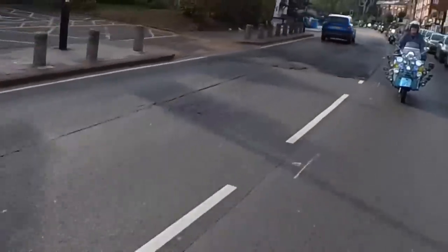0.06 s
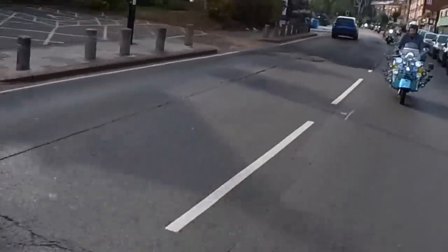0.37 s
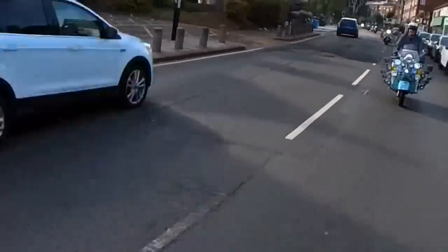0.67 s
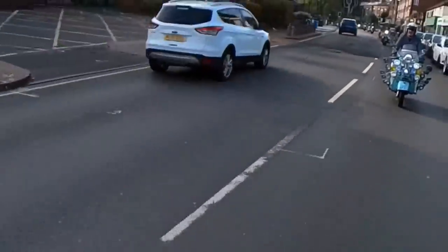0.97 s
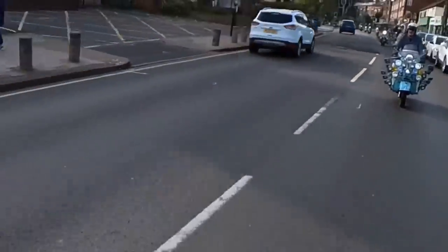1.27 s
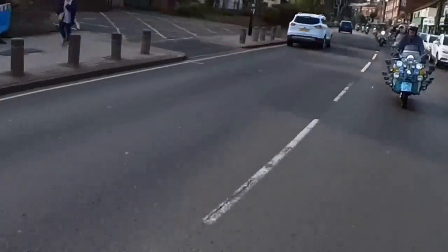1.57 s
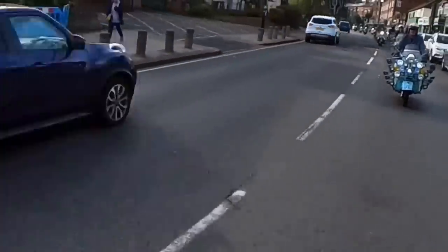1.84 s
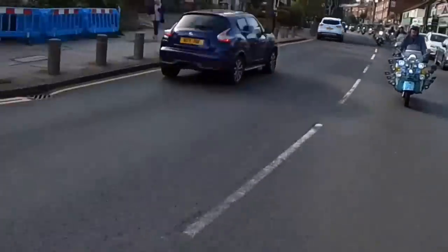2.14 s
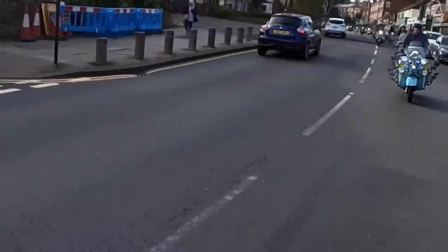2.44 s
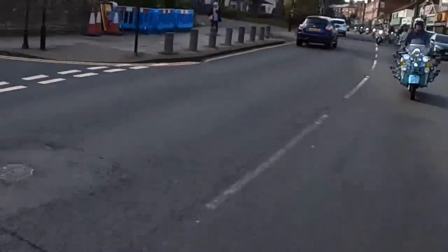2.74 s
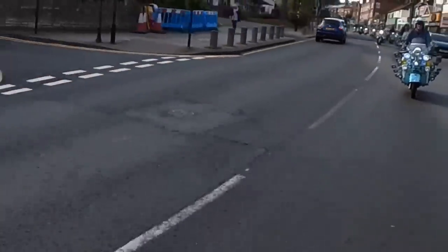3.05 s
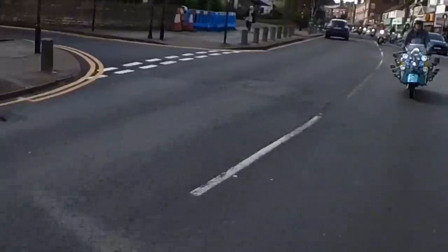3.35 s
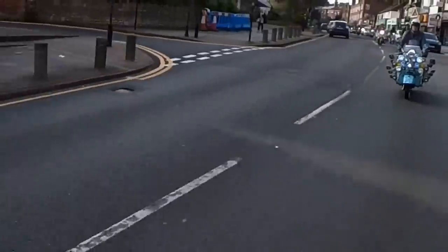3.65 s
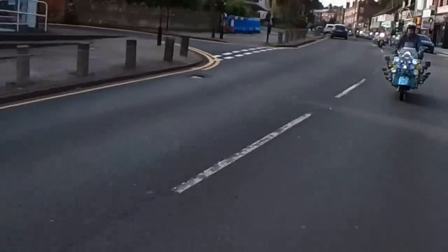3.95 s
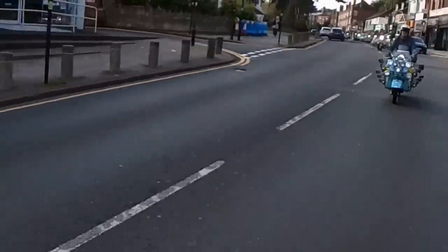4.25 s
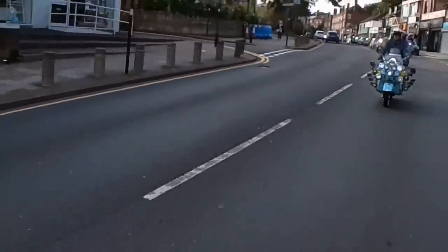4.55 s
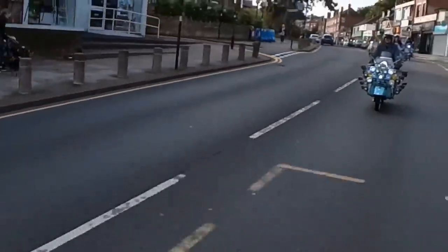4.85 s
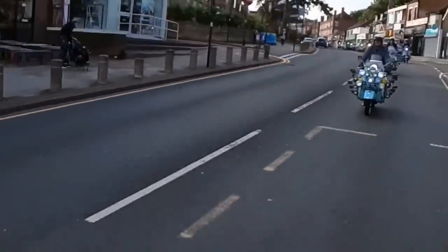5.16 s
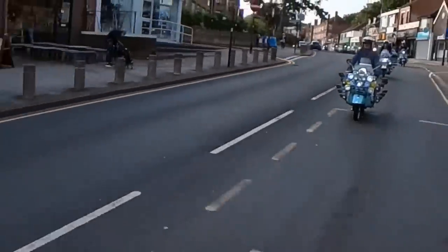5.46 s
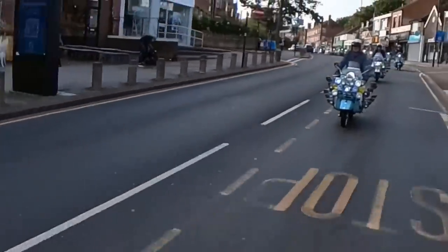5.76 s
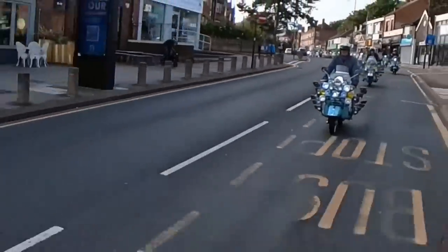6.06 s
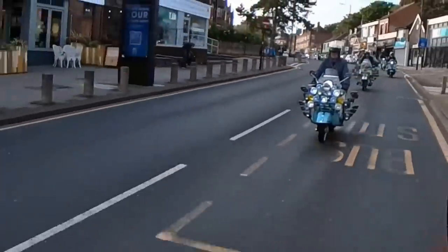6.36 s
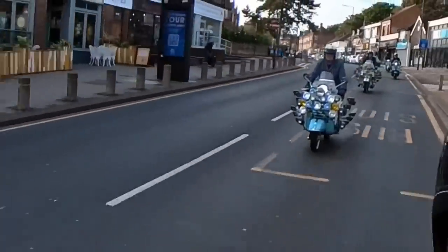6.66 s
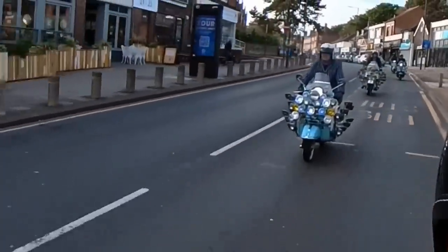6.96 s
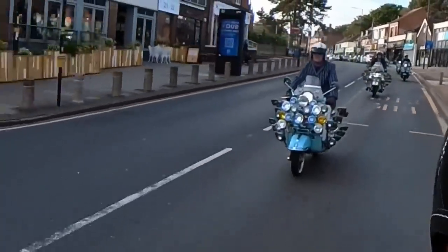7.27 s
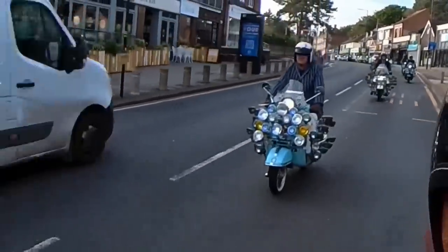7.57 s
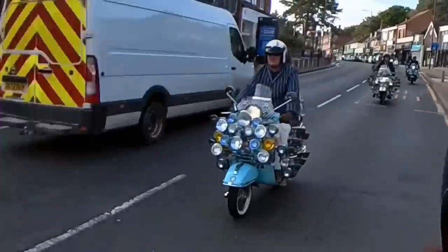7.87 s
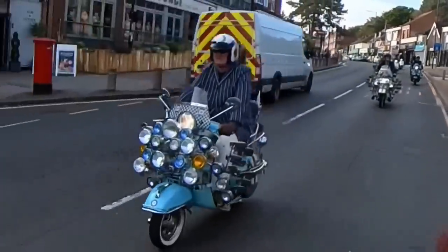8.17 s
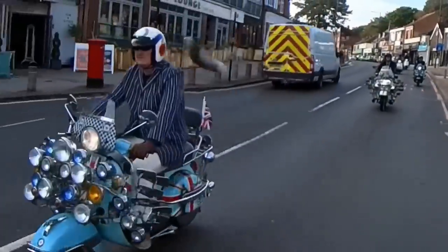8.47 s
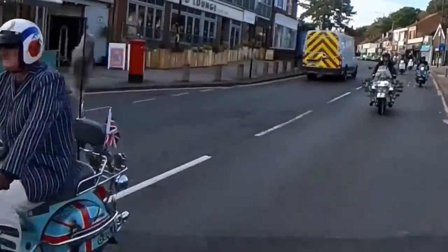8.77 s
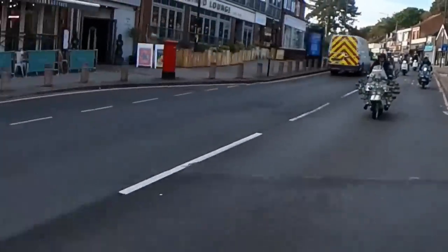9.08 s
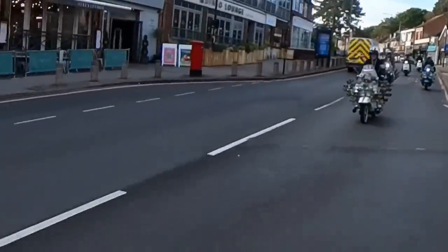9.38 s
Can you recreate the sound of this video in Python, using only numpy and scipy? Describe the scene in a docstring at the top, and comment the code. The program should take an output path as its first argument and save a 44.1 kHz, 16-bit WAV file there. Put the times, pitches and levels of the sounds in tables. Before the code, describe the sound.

A single-cylinder motorbike drones under throttle, heard from the bike itself, with wind rumbling on the microphone and tyres rushing on the road. Several dull bumps and sharp metallic ticks come in the first half second, and a car swishes faintly past at about 1.3 seconds. From 2.5 seconds the throttle closes and the engine falls in pitch. Between 3 and 4.3 seconds a loud squall hits the microphone in short, crackling blasts, briefly pushing the other sounds down. The engine then slows to an even, round thudding, while the slack chain rattles and rings lightly against its guard. Softer gusts keep thumping now and then. A van passes with a mild tyre swell around 7.7 seconds. From about 8.5 seconds a two-stroke scooter grows louder alongside, popping unevenly, with a short metallic clatter just after 9 seconds, the motorbike still thudding.

```python
"""Motorbike leading a scooter convoy

A single-cylinder engine pulls, then the throttle closes and it slows to an even thudding while
the chain rattles. Tyres rush, a car and a van go by, and a popping scooter draws past at the end.
Bumps in the road thump at the start. Wind buffets the microphone of a camera on the bike and
tears at it in a squall. The camera turns everything down whenever the sound gets too loud."""
import sys
import numpy as np
from scipy import signal
from scipy.fft import rfft, irfft, next_fast_len
from scipy.io import wavfile
from scipy.ndimage import uniform_filter1d, minimum_filter1d, map_coordinates

SR = 44100
rng = np.random.default_rng(int(sys.argv[2]) if len(sys.argv) > 2 else 0)


def generate_wav(sig):
    """Save sig (samples, or channels by samples) to the path in sys.argv[1] as 16-bit PCM at SR."""
    pcm = np.round(np.clip(np.atleast_2d(sig).T, -1, 1) * 32767).astype(np.int16)
    wavfile.write(sys.argv[1], SR, pcm)


N = 420273

# how fast the bike's engine fires: time_s, rate_hz
FIRING_RATE = [(0, 34.72), (2.3, 34.89), (2.9, 31.37), (3.75, 28.12), (4.5, 26.43), (6.05, 23.89),
               (6.9, 23.63), (7.55, 25.05), (8, 24.25), (8.95, 23.48), (9.53, 23.27)]
# how far the throttle is open: time_s, opening (0 to 1)
THROTTLE_OPENING = [(0, 0.95), (2.4, 0.95), (3.1, .34), (3.7, 0.03), (9.53, 0.12)]
# exhaust loudness and the bark of its upper harmonics: time_s, level_db, bark (0 to 1)
EXHAUST_LEVEL = [(0, -27, 0), (1.3, -28.5, 0.55), (1.7, -30.5, 0.48), (2.5, -30.5, 0.65), (2.9, -26, 0),
                 (3.4, -19.5, 0.3), (4.6, -23, 0.03), (5.1, -24.5, 0.06), (5.75, -24, 0.18),
                 (6.2, -27.5, 0.54), (7.3, -26.5, 0.11), (8.7, -24.5, 0.01), (9.1, -26, 0.1),
                 (9.53, -26.5, 0.9)]
# exhaust tone with the throttle open: multiple of the firing rate, level_db
PULLING_HARMONICS = [(1, -11), (2, 5), (3, -5), (4, -7.5), (5, -4), (6, -3.5), (7, -11.5), (8, -24),
                     (9, -30.5), (10, -11), (11, -29), (12, -32.5), (13, -21), (14, -18.5), (15, -39.5),
                     (16, -28)]
# exhaust tone with the throttle shut: multiple of the firing rate, level_db
COASTING_HARMONICS = [(1, -22), (2, -9.5), (3, 1.5), (4, 5.5), (5, 2.5), (6, -2.5), (7, -10), (8, -6),
                      (9, -20), (10, -15.5), (11, -35.5), (12, -23.5), (13, -24.5), (14, -31), (15, -26),
                      (16, -42.5), (17, -19), (18, -31.5), (19, -34.5), (20, -39.5)]
# pipe resonances that the harmonics slide through as the bike slows: pitch_hz, gain_db
PIPE_TONE = [(80, 1.5), (96, 2.5), (107, -2), (118, 0.5), (130, 3.5), (145, 0.5), (162, -1), (195, 0),
             (380, -3.5), (430, 9.5), (460, 3.5), (490, 3.5), (560, 6.5)]
# tone of the exhaust's bark: pitch_hz, gain_db
BARK_TONE = [(90, -40), (125, -17), (160, 1), (200, 12), (250, 0.5), (300, 0), (350, 4.5), (430, -11.5),
             (600, -1), (900, -22.5)]
# tone of gas leaving a muffler: pitch_hz, gain_db
MUFFLER_TONE = [(60, -22.5), (130, -4.5), (200, 3), (280, -0.5), (400, -0.5), (600, -20.5), (1200, -31),
                (3000, -40.5), (5000, -73.5)]

# main slaps of the drive chain: time_s, level_db
MAIN_SLAPS = [(0.025, -52.5), (0.1, -49.5), (0.1773, -47), (0.2702, -43), (0.377, -50), (0.559, -51),
              (0.864, -50.5), (1.138, -55), (1.343, -49), (1.394, -50), (1.474, -45.5), (1.6197, -51.5),
              (1.6982, -48.5), (2.0064, -51), (2.084, -56), (2.34, -51.5), (2.436, -47.5), (2.501, -46),
              (2.582, -48), (2.693, -53), (2.7734, -45.5), (2.837, -50), (2.917, -52.5), (4.412, -46.5),
              (4.493, -47), (4.603, -44.5), (4.67, -45), (4.734, -47), (4.849, -50), (4.913, -50),
              (5.01, -45.5), (5.172, -48.5), (5.257, -47.5), (5.33, -47), (5.401, -46.5), (5.499, -45.5),
              (5.561, -48.5), (5.69, -49), (5.772, -48), (5.87, -47), (6.049, -54), (6.13, -48),
              (6.21, -45), (6.275, -48.5), (6.388, -44.5), (6.472, -45), (6.568, -44), (6.652, -50),
              (6.751, -47), (6.829, -49), (6.947, -43.5), (7.028, -45), (7.129, -46.5), (7.21, -50),
              (7.276, -47.5), (7.341, -46.5), (7.54, -49.5), (7.719, -47), (7.866, -47.5), (7.931, -47),
              (8.146, -52), (8.229, -46.5), (8.296, -49.5), (8.3803, -47.5), (8.895, -51), (8.986, -47),
              (9.084, -45), (9.222, -49.5), (9.369, -50.5)]
# tone of the running chain: pitch_hz, gain_db
CHAIN_TONE = [(3000, -33.5), (5200, -18), (5700, -9), (6400, -2.5), (7100, 0.5), (7800, -4), (8500, -13),
              (9100, -30)]
# tone of a slap scraping the chain guard: pitch_hz, gain_db
SLAP_TONE = [(700, -16.5), (1300, 8.5), (1620, 0.5), (1900, 14), (2800, 2.5), (3600, -4.5), (4300, -7.5),
             (4800, -21.5), (5300, -11.5), (5700, -5), (7100, 8), (8300, -6.5), (9100, -12.5)]
# ringing notes of the guard: pitch_hz, level_db, fade_s (time to fall 60 dB)
GUARD_NOTES = [(1875, 3, 0.09), (1815, 1.5, 0.09), (1965, -3, 0.07), (2205, -7, 0.06), (2740, -7, 0.08),
               (2910, -12, 0.06), (3540, -14, 0.08), (3800, -18, 0.08)]
# sharp ticks from the bike's fittings: time_s, level_db
FITTING_TICKS = [(0.1785, -46), (.2698, -37), (.351, -50), (.363, -44), (0.3778, -35), (.433, -50.5),
                 (0.4543, -39.5), (.545, -52), (.562, -40), (0.702, -43), (1.218, -45), (1.2352, -39.5),
                 (1.3143, -45.5), (1.343, -33), (1.618, -46), (1.699, -44), (1.763, -49.5), (2.007, -44.5),
                 (2.1425, -42.5), (2.228, -51), (2.436, -44.5), (2.501, -45.5), (2.693, -53),
                 (2.773, -49.5), (5.015, -41.5), (6.749, -40), (6.831, -43.5), (7.061, -34),
                 (8.6479, -34.5)]
# tone of a tick: pitch_hz, gain_db
TICK_TONE = [(1500, -15.5), (3500, -1.5), (4700, -17), (5700, -1), (7100, 12), (8300, 2), (9100, -14)]

# wind rumble between gusts: time_s, level_db
WIND_LEVEL = [(0, -30.5), (.9, -36), (2.7, -27.5), (4.5, -35.5), (6.9, -39.5), (8.3, -45.5), (8.7, -43),
              (9.53, -43.5)]
# gusts that thump the microphone: time_s, level_db, half_length_s
WIND_GUSTS = [(0, -26, 0.026), (0.33, -25.5, 0.07), (0.57, -26, 0.11), (1.458, -44.5, 0.083),
              (1.71, -26, 0.27), (2.106, -27.5, 0.046), (2.634, -22.5, 0.1), (2.929, -31, 0.19),
              (4.227, -13.5, 0.083), (5.065, -25.5, 0.11), (5.666, -27.5, 0.019), (5.895, -23.5, 0.03),
              (6.863, -34.5, 0.13), (7.361, -37.5, 0.092), (7.714, -34, 0.053), (8.006, -30, 0.17),
              (8.259, -37, 0.11), (8.456, -16.5, 0.022)]
# tone of the wind rumble: pitch_hz, gain_db
WIND_TONE = [(10, -27.5), (25, -13.5), (50, -2), (80, -2.5), (140, -8.5), (220, -16.5), (400, -37.5),
             (900, -52.5), (2500, -91)]
# strength of the squall: time_s, level_db
SQUALL_LEVEL = [(2.9, -42), (3.03, -9), (3.25, -21), (3.43, -10.5), (3.7, -33), (3.86, -10), (4.02, -16.5),
                (4.22, -9), (4.31, -43.5)]
# four dull thumps from road bumps, then blasts of wind:
# time_s, level_db, length_s, treble_tilt_db_per_octave
BUMPS_AND_BLASTS = [(0.027, -25, 0.0077, -12), (0.101, -24.5, 0.0073, -13), (0.177, -27.5, 0.01, -15),
                    (0.275, -25, .02, -18), (0.348, -18, 0.0055, -11.5), (2.95, -16.5, 0.013, 3.5),
                    (3.019, -8.5, 0.015, -8.5), (3.062, -10.5, 0.011, -0.5), (3.085, -8.5, 0.02, -2),
                    (3.202, -4, 0.012, 3.5), (3.263, -23, 0.005, 0.5), (3.351, -8.5, 0.0109, -11),
                    (3.378, -16, 0.0086, -6), (3.405, -15.5, 0.0076, -13), (3.453, -3.5, 0.012, 0),
                    (3.469, 1.5, 0.014, 0), (3.479, 3.5, 0.0054, -5), (3.493, -1.5, 0.01, -2.5),
                    (3.511, -12, 0.016, -4.5), (3.568, -19, 0.0082, -1.5), (3.605, -20, 0.025, -4),
                    (3.716, -25, 0.0059, -4.5), (3.807, -23, 0.021, -8), (3.835, -11.5, 0.015, -7),
                    (3.88, -10.5, 0.0091, -7), (3.892, 0, 0.0064, -5), (3.907, -6.5, 0.013, -6.5),
                    (3.93, 1.5, 0.006, -2), (3.95, -11.5, 0.0052, -1), (3.994, -14.5, 0.013, -6),
                    (4.014, -13, 0.0074, -0.5), (4.075, -12, 0.0083, -7.5), (4.093, -15.5, 0.011, -9.5),
                    (4.16, -16.5, 0.014, -24.5), (4.189, -4, 0.022, -14.5), (4.237, -8, 0.023, -16.5),
                    (4.257, -4.5, 0.0075, -5.5), (4.267, -9.5, .012, -11), (4.282, -17, .012, -10.5)]
# tone shared by the bumps, the blasts and the churning air: pitch_hz, gain_db
THUMP_TONE = [(30, 5), (130, 12), (300, 7), (520, 5), (720, 3.5), (950, 0.5), (1300, -8), (1800, -12),
              (2300, -23.5), (2900, -27.5), (3600, -42.5), (5000, -63), (6800, -43.5), (8200, -60),
              (9200, -75.5)]

# the overtaking scooter's engine: time_s, firing_rate_hz, level_db
SCOOTER_ENGINE = [(0, 66, -68), (5.5, 65.6, -45.5), (7.8, 61.6, -42.5), (8.6, 66, -37.5), (8.9, 62, -33.5),
                  (9.15, 54.7, -32), (9.53, 56, -31)]
# its mirrors and racks clattering: time_s, level_db, pitch_hz
SCOOTER_CLATTER = [(9.09, -60, 3730), (9.208, -42.5, 2310), (9.301, -46, 2300), (9.368, -54, 2730)]
# rush of tyres and traffic: time_s, level_db
ROAD_LEVEL = [(0, -55.5), (.5, -56), (1.3, -53.5), (2.2, -55), (2.55, -54), (2.8, -57), (4.3, -52.5),
              (6, -54), (6.5, -54), (7.7, -54.5), (8.5, -52.5), (9.1, -54.5), (9.53, -56)]
# tone of the low road roar: pitch_hz, gain_db
ROAR_TONE = [(60, -24.5), (150, 2), (260, 8), (340, -2.5), (480, 2), (620, -5), (900, -10), (1300, -18.5),
             (2000, -23.5), (4000, -61)]
# tone of the tyre hiss: pitch_hz, gain_db
TYRE_TONE = [(400, -12.5), (1000, 6), (1450, 3), (1630, -4.5), (1850, 2), (2350, -3.5), (2800, -3.5),
             (3200, -12.5), (3700, -15), (4300, -25.5), (5200, -39), (7000, -48.5)]
# brief swells of the road roar: time_s, level_db, half_length_s
ROAD_SWELLS = [(0.267, -39, 0.064), (6.577, -40.5, .14), (7.876, -40.5, 0.072)]
# tone of those swells: pitch_hz, gain_db
SWELL_TONE = [(120, -14), (260, 7), (350, 3.5), (560, -2.5), (850, -12.5), (1500, -22), (3000, -46.5)]
# a car and a van in the other lane: loudest_at_s, level_db, half_length_s
VEHICLES = [(1.293, -50.5, 0.48), (7.735, -50.5, 0.7)]
# tone of their tyres on the asphalt: pitch_hz, gain_db
VEHICLE_TONE = [(300, -10), (650, 3), (950, 2), (1400, -2), (2000, -8), (2800, -17), (3700, -30),
                (5000, -54.5)]


def engine(rough_db=1.0, gas_db=-22, bark_waver_db=2, stray_cycles=.006):
    """Each firing thuds out of the pipe: a hard drone when pulling, round beats when coasting."""
    rate, = curves(FIRING_RATE)
    level_db, bark = curves(EXHAUST_LEVEL)
    throttle, = curves(THROTTLE_OPENING)
    cycles = np.cumsum(rate) / SR
    cycles -= cycles[round(5.992 * SR)]  # line the beats up with this moment
    cycles += stray_cycles * (1 - throttle) * wobble(24)  # fuel burns unevenly on a shut throttle
    pulling = throttle * exhaust_puffs(PULLING_HARMONICS, cycles)
    coasting = (1 - throttle) * exhaust_puffs(COASTING_HARMONICS, cycles)
    beats = filtered(pulling + coasting, PIPE_TONE)
    # a gulp of swirling gas follows each firing, and no two firings are equally strong
    gulps = rng.standard_normal(N) * np.exp(-2.5 * (cycles % 1))
    gas = amp(gas_db) * unit(filtered(gulps, MUFFLER_TONE))
    beats = (beats + gas) * amp(level_db + rough_db * wobble(28))
    # the bark comes and goes with the burn
    return beats + bark * amp(bark_waver_db * wobble(14)) * filtered(beats, BARK_TONE)


def exhaust_puffs(harmonics, cycles, size=1024):
    """One puff per engine cycle, starting sharply and dying away, with the given harmonics."""
    multiples, db = np.transpose(harmonics)
    top = 2 * multiples[-1]
    harmonic = np.arange(size // 2 + 1)
    level_db = np.interp(harmonic, np.r_[0, multiples, top], np.r_[-40, db, -65])
    # these steps (minimum phase) move the energy to the front of the puff
    cepstrum = irfft(np.log(amp(level_db)))
    cepstrum[1:size // 2] *= 2
    cepstrum[size // 2 + 1:] = 0
    puff = irfft(np.exp(rfft(cepstrum)) * (harmonic < top))
    return np.interp(cycles % 1, np.arange(size + 1) / size, unit(np.r_[puff, puff[0]]))


def chain(run_db=-68, slack_db=2, hiss_db=-1, link_db=-8, buzz_db=-6, links_per_s=65,
          scrape_db=-1, ring_db=-6, slap_fade_s=.042, taut_tilt_db=-2):
    """The chain hisses and ticks over its sprockets and slaps its guard about a dozen times a second."""
    slack = 1 - curves(THROTTLE_OPENING)[0]  # off the throttle the chain hangs loose
    t = np.arange(SR // 6) / SR
    links = (rng.random(N) < links_per_s / SR) * rng.standard_normal(N)
    hiss = amp(hiss_db + 3.2 * wobble(90)) * noise(CHAIN_TONE)
    clicks = amp(link_db) * unit(filtered(links, CHAIN_TONE))
    buzz = amp(buzz_db) * unit(signal.fftconvolve(links, guard_ring(t))[:N])
    running = amp(run_db + slack_db * slack) * (hiss + clicks + buzz)
    onset = 1 - np.exp(-t / .0003)
    fade = amp(-60 * t / slap_fade_s) * onset
    # each slap is a quick chatter of several links
    chatter = amp(7.3 * wobble(300)) * rng.standard_normal(N)
    scrape, ring = np.zeros(N), np.zeros(N)
    for s, db in chain_slaps(slack):
        start = round(s * SR)
        burst = fade * chatter.take(start + np.arange(len(t)), mode="wrap")
        slap = filtered(burst, SLAP_TONE, taut_tilt_db * (1 - slack[start]))  # duller when taut
        add(scrape, s, amp(db + scrape_db) * slap * np.linalg.norm(fade) / np.linalg.norm(slap))
        add(ring, s, amp(db + ring_db) * guard_ring(t) * onset)
    return running + scrape + slack * ring  # only a slack chain swings far enough to ring the guard


def chain_slaps(slack, swing_s=.09, scatter_s=.004, light_db=-4, taut_db=-2, scatter_db=1.2):
    """The main slaps, plus a lighter one on every swing between them, as rows of time_s, level_db."""
    main_s, main_db = np.transpose(MAIN_SLAPS)
    light_s = np.concatenate([np.linspace(a, b, max(round((b - a) / swing_s), 1) + 1)[1:-1]
                              for a, b in zip(main_s, main_s[1:])])
    late, stray = rng.standard_normal((len(light_s), 2)).T
    taut = 1 - slack[(light_s * SR).astype(int)]
    db = np.interp(light_s, main_s, main_db) + light_db + taut_db * taut + scatter_db * stray
    return list(MAIN_SLAPS) + list(zip(light_s + scatter_s * late, db))


def guard_ring(t, scatter_db=2, pitch_scatter=.012):
    """The struck chain guard rings, its notes a little different in strength and pitch each time."""
    strays = rng.standard_normal((len(GUARD_NOTES), 2)) * [scatter_db, pitch_scatter]
    return sum(amp(db + stray_db - 60 * t / fade_s) * np.sin(2 * np.pi * hz * (1 + detune) * t)
               for (hz, db, fade_s), (stray_db, detune) in zip(GUARD_NOTES, strays))


def fittings(tick_db=-1, fade_s=.0061, shiver_db=-19, shiver_fade_s=.047):
    """Loose metal fittings tick, dry and very short, and shiver faintly afterwards."""
    out, t = np.zeros(N), np.arange(SR // 25) / SR
    fade = amp(-60 * t / fade_s) + amp(shiver_db - 60 * t / shiver_fade_s)
    for s, db in FITTING_TICKS:
        burst = np.pad(rng.standard_normal(len(t)) * fade, (20, 0))
        tick = filtered(burst, TICK_TONE)
        add(out, s, amp(db + tick_db) * tick / abs(tick).max())
    return out


def wind(rumble_db=2, gust_db=2, lump_db=2.5, squall_db=-5):
    """Swirls of air thump against the microphone, harder in each gust and in the squall."""
    t = np.arange(N) / SR
    slipstream = amp(curves(WIND_LEVEL)[0] + rumble_db)
    squall = amp(curves(SQUALL_LEVEL)[0] + squall_db)
    buffeting = (slipstream + squall) * amp(lump_db * wobble(18))
    gusts = sum(amp(db + gust_db) / (1 + ((t - s) / half_s) ** 4) for s, db, half_s in WIND_GUSTS)
    return np.hypot(buffeting, gusts) * noise(WIND_TONE)


def bumps_and_blasts(flicker_db=2.5, tail_db=-8):
    """Road bumps thump dully at the start, then wind hits the microphone in short crackling blasts."""
    out, t = np.zeros(N), np.arange(-SR // 8, SR // 8) / SR
    middle = len(t) // 2
    flicker = amp(flicker_db * wobble(600))  # the level jumps every millisecond or two
    for s, db, length_s, tilt_db in BUMPS_AND_BLASTS:
        start_s = s + t[0]
        half = round(length_s * SR / 2)
        phases, tail = rng.random(len(t)), rng.standard_normal(len(t))
        body = unit(irfft(np.exp(2j * np.pi * phases[:half + 1])))  # all pitches equally strong
        body = np.pad(body, (middle - half, len(t) - middle - half))
        tail *= (t > length_s / 2) * amp(tail_db) * np.exp(-abs(2 * t / length_s - 1))
        crackle = flicker.take(round(start_s * SR) + np.arange(len(t)), mode="wrap")
        thump = filtered((body + tail) * crackle, THUMP_TONE, tilt_db) * np.hanning(len(t))
        add(out, start_s, amp(db) * thump * np.sqrt(2 * half) / np.linalg.norm(thump))
    return out


def churning_air(churn_db=-8, lump_db=4, tilt_db=-8):
    """In the squall, churning air fills the gaps between the blasts with dull, uneven puffs."""
    swirls = rng.standard_normal(N) * amp(lump_db * wobble(55) + 1.7 * wobble(600))
    return amp(curves(SQUALL_LEVEL)[0] + churn_db) * unit(filtered(swirls, THUMP_TONE, tilt_db))


def scooter(stray_cycles=.04, scatter_db=3, rasp=.96):
    """A two-stroke engine pops unevenly through a small muffler, each pop with a spit of gas."""
    rate, db = curves(SCOOTER_ENGINE)
    cycles = np.cumsum(rate) / SR + stray_cycles * wobble(40)
    pops = np.diff(np.floor(cycles), prepend=0) * amp(scatter_db * wobble(60))
    gas = rng.standard_normal(N) * np.exp(-3 * (cycles % 1))
    return amp(db) * unit(filtered(unit(pops) + rasp * unit(gas), MUFFLER_TONE))


def scooter_clatter(fade_s=.07, width_octaves=.061):
    """The scooter's thin metal parts buzz briefly, each around its own pitch."""
    out, t = np.zeros(N), np.arange(SR // 8) / SR
    onset = 1 - np.exp(-t / .002)
    for s, db, hz in SCOOTER_CLATTER:
        band = [(hz * 2 ** (step * width_octaves), gain_db)
                for step, gain_db in [(-4, -60), (-1, -4), (0, 0), (1, -4), (4, -60)]]
        buzz = unit(filtered(rng.standard_normal(len(t)), band))
        add(out, s, amp(db - 60 * t / fade_s) * onset * buzz)
    return out


def road(roar_db=18, flutter_db=1.16):
    """Tyres and the convoy merge into a rush that flutters in the wind and swells now and then."""
    t = np.arange(N) / SR
    level_db = curves(ROAD_LEVEL)[0] + flutter_db * wobble(45)
    roar = amp(level_db + roar_db) * noise(ROAR_TONE)
    tyres = amp(level_db) * noise(TYRE_TONE)
    swells = sum(amp(db) * np.exp(-.5 * ((t - s) / half_s) ** 2) for s, db, half_s in ROAD_SWELLS)
    return roar + tyres + swells * noise(SWELL_TONE)


def passing_vehicles():
    """The tyre noise of each oncoming vehicle grows as it nears and fades as it draws away."""
    t = np.arange(N) / SR
    loudness = sum(amp(db) / (1 + ((t - s) / half_s) ** 2) for s, db, half_s in VEHICLES)
    return loudness * noise(VEHICLE_TONE)


def gain_control(x, limit_db=-21.5, recover_s=.26):
    """The camera turns down just ahead of any sound over its limit, then eases back up."""
    level_db = 10 * np.log10(abs(uniform_filter1d(x ** 2, size=800)) + 1e-12)
    needed_db = minimum_filter1d(np.minimum(limit_db - level_db, 0), size=300)
    fading = np.exp(-np.arange(N) / SR / recover_s)
    # each cut fades away until a deeper one takes over
    gain_db = np.minimum.accumulate(needed_db / fading, axis=-1) * fading
    return x * amp(uniform_filter1d(gain_db, size=200))


def amp(db):
    """Turn decibels into a number to multiply by."""
    return 10 ** (np.asarray(db) / 20)


def unit(x):
    """Scale x to an average (rms) level of 1."""
    return x / np.sqrt(np.mean(x ** 2) + 1e-20)


def curves(rows):
    """Join a table's rows with straight lines: one curve for each column after the time."""
    times, *columns = np.transpose(rows)
    return [np.interp(np.arange(N) / SR, times, column) for column in columns]


def wobble(rate):
    """A smooth curve through `rate` random points a second."""
    points = rng.standard_normal(int(N * rate / SR) + 4)
    return map_coordinates(points, [np.arange(N) * rate / SR])


def filtered(x, tone, tilt_db=0):
    """Shape x with a tone table, adding tilt_db for each octave above 500 Hz."""
    size = next_fast_len(len(x) + 4096)
    octave = np.log2(np.fft.rfftfreq(size, 1 / SR) + 1)
    hz, db = np.transpose(tone)
    treble = np.maximum(octave - np.log2(500), 0)
    gain = amp(np.interp(octave, np.log2(hz), db) + tilt_db * treble)
    return irfft(rfft(x, size) * gain, size)[:len(x)]


def noise(tone):
    """Noise with the given tone, at an average level of 1."""
    return unit(filtered(rng.standard_normal(N), tone))


def add(track, start_s, sound):
    """Mix a sound into the track, dropping whatever falls outside it."""
    start = round(start_s * SR)
    sound = sound[max(-start, 0):]
    part = track[max(start, 0):][:len(sound)]
    part += sound[:len(part)]


def scene():
    """All the sources meet at one microphone."""
    traffic = engine() + scooter() + scooter_clatter() + road() + passing_vehicles()
    rattles = chain() + fittings()
    buffeting = wind() + churning_air() + bumps_and_blasts()
    return (traffic + rattles + buffeting)[None]


def record(dry, ceiling=.29, top_hz=9050):
    """The camera turns loud moments down, holds back sharp peaks and cuts the highest treble."""
    ducked = gain_control(dry)
    peak_gain = np.minimum(1, ceiling / (abs(ducked) + 1e-9))
    held = ducked * uniform_filter1d(minimum_filter1d(peak_gain, size=260), size=260)
    size = next_fast_len(N + 4096)
    below_top = np.fft.rfftfreq(size, 1 / SR) < top_hz
    return irfft(rfft(held, size) * below_top, size)[:, :N]


dry = scene()
out = record(dry)
generate_wav(out)
```